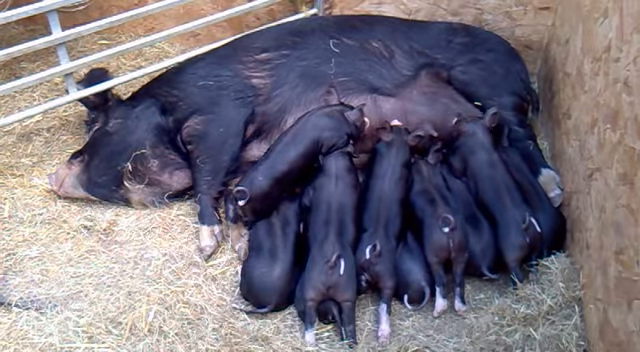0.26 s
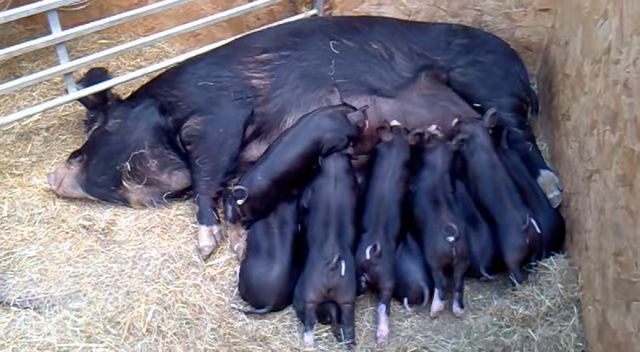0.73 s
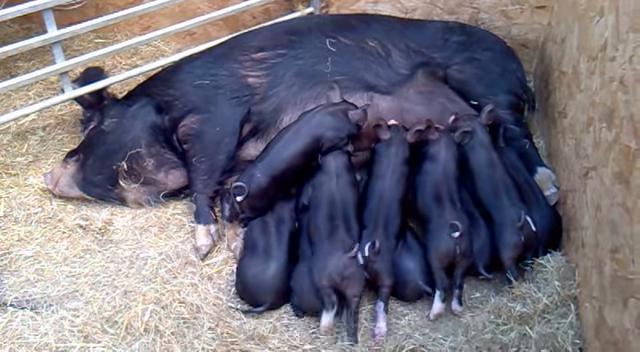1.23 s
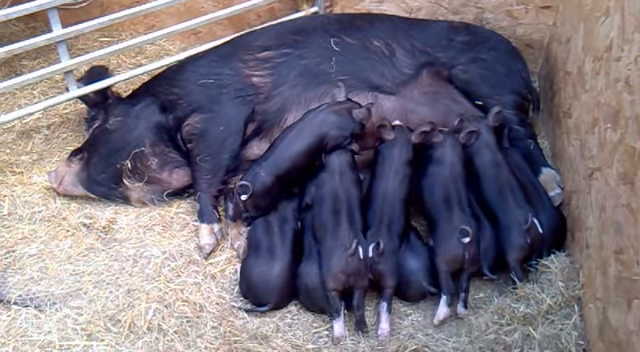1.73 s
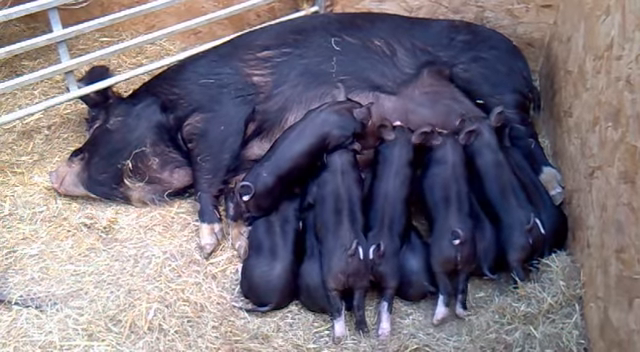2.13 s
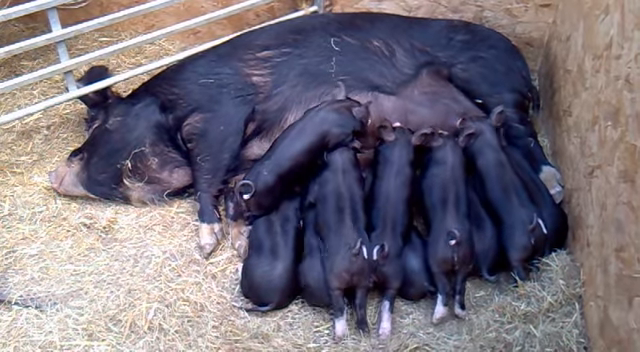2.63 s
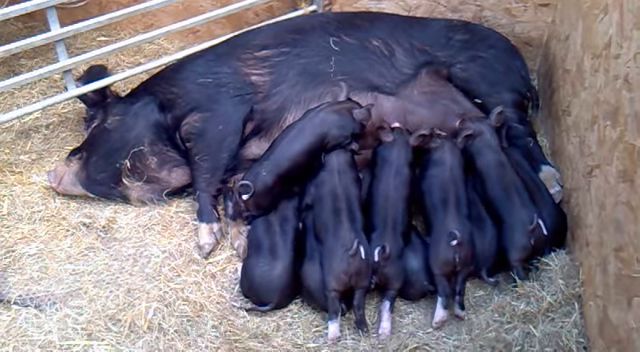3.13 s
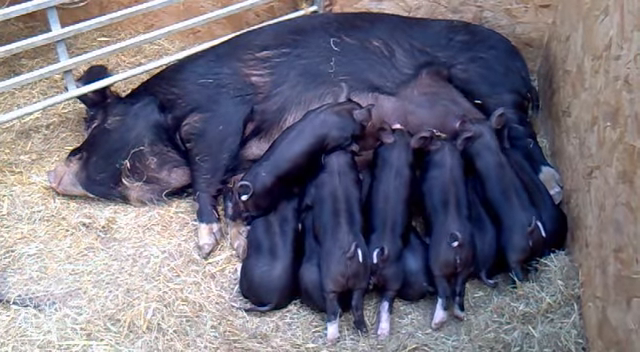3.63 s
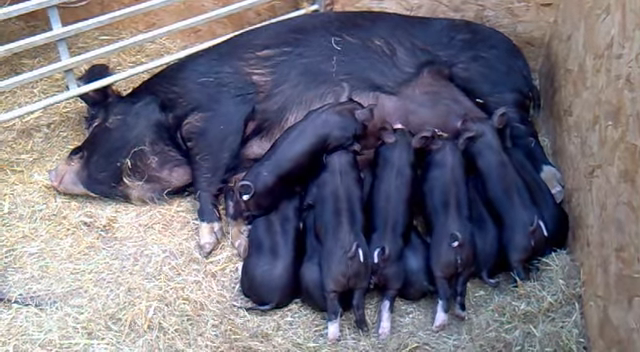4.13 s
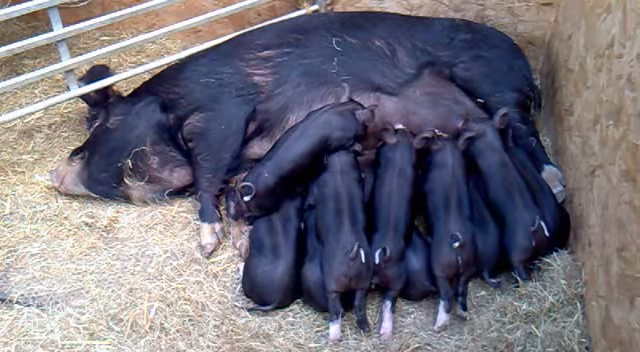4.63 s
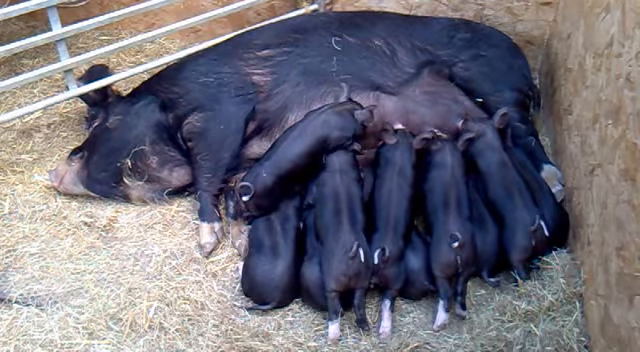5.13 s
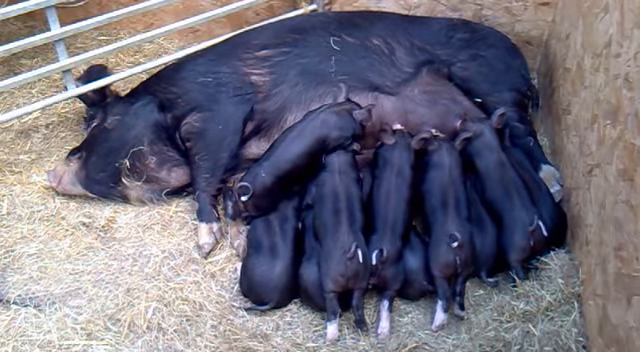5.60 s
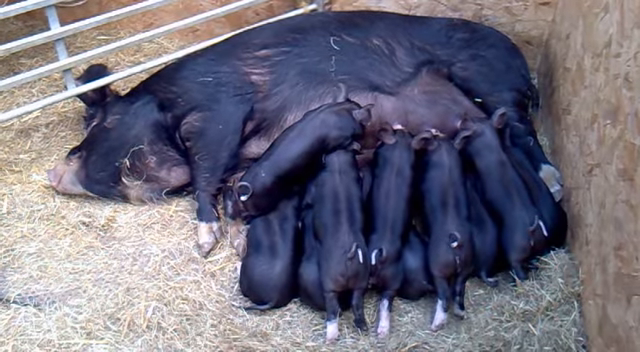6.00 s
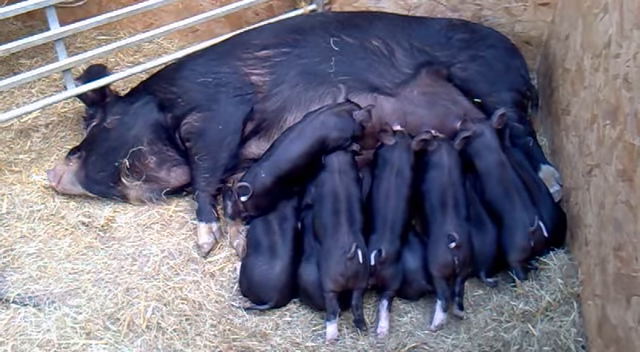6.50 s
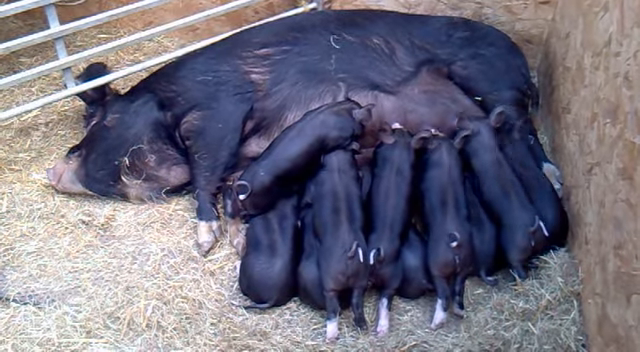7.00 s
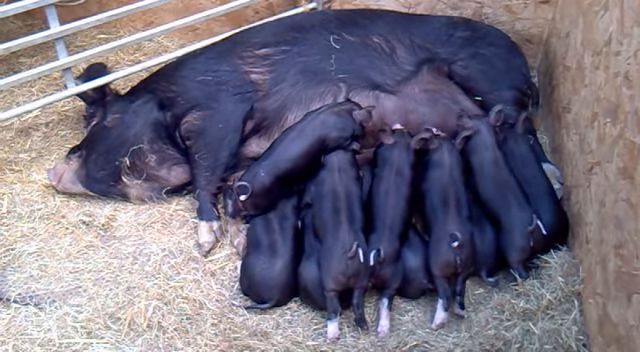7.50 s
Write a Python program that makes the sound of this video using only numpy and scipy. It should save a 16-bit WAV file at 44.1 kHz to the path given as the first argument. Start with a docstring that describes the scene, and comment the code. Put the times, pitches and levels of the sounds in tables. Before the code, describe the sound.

Heard fairly close in a boarded, straw-bedded pen, a nursing sow makes about seventeen short low grunts, croaky and nasal, some preceded by tiny throat catches. Between them come small suckling smacks, one clearer near one and a half seconds, and dry straw snaps. Thin airy whistles are barely audible far off, over low, still barn air, until a last firm grunt near the end.

```python
"""Sow grunting as piglets suckle

In a straw-bedded wooden pen a sow grunts in short runs. Each grunt is a few slow throat flaps, about 30
a second: pressure pulses excite the pen's modes, and filtered noise and a rising chirp sound in the snout.
Piglets smack (wavering tones with clicks) and stir the straw (clumps of band-passed grains).
Still air (coloured noise) and thin far-off whistles (narrow noise bands) fill the quiet barn."""
import sys
import numpy as np
from scipy import signal
from scipy.fft import rfft, irfft
from scipy.io import wavfile

SR = 44100
rng = np.random.default_rng(int(sys.argv[2]) if len(sys.argv) > 2 else 0)


def bounce(signal):
    """Save signal as a 16-bit WAV file at the path given by the first command-line argument."""
    frames = np.transpose(np.atleast_2d(signal))
    limited = np.clip(frames, -1, 1)
    pcm = np.round(limited * 32767).astype(np.int16)
    wavfile.write(sys.argv[1], SR, pcm)


N = 341775
TAIL = SR   # samples kept of any echo

# The sow's grunts. Each row: start in seconds, length in seconds, level of the strongest flap in relative dB,
# curvature of the swell in dB (fall from a crest to age zero), age at the crest in seconds,
# age at the widest nostrils in seconds, nasal rasp there in dB relative to the flap,
# snout chirp there in dB relative to the flap, mouth lift in dB.
GRUNTS = [(0.001, 0.1, -23.5, 9.5, .056, 0.045, -7.5, -14, -2),
          (0.546, .066, -23.5, 8.5, 0.033, 0.037, -7, -16.5, -1.5),
          (0.839, 0.1, -28.5, 14, 0.09, .004, -7, -15.5, 0),
          (1.356, .139, -24, 25, .092, 0.087, -7.5, -13.5, -3),
          (1.853, .099, -22.5, 20, .084, .066, -10, -19, 1.5),
          (2.366, 0.071, -22.5, 16.5, 0.073, 0.077, -6.5, -16.5, -0.5),
          (2.616, 0.1, -27, 22, 0.19, 0.04, -8, -17, 2.5),
          (2.878, 0.076, -32, 12, 0.14, 0.0044, -4.5, -13.5, 1),
          (3.62, .104, -23, 15, 0.063, 0.048, -9.5, -16.5, 3.5),
          (4.222, .067, -26, 15.5, .05, 0.046, -13, -22.5, 1.5),
          (4.586, 0.074, -34.5, 5, 0.048, 0.0044, -6, -14, 3.5),
          (4.815, .071, -31.5, 14.5, 0.14, 0.0078, -6, -15.5, 3),
          (5.469, .069, -25.5, 6, 0.048, 0.048, -9.5, -16, 2),
          (6.056, 0.064, -25, 15.5, 0.054, 0.047, -11, -17, -0.5),
          (6.356, 0.068, -30.5, 10, 0.073, 0.011, -8.5, -20, 1.5),
          (6.597, 0.077, -34, 16, 0.22, 0.0011, -9.5, -16, 2.5),
          (7.203, 0.1, -23, 23.5, .083, 0.078, -9.5, -16, 2)]


def from_db(db):
    """Amplitude ratio: 20 dB is a factor of ten."""
    return 10 ** (np.asarray(db) / 20)


def unit(x):
    """Energy normalization: the squares sum to one."""
    return x / np.sqrt(np.sum(x ** 2) + 1e-20)


def at_hz(points, hz):
    """Linear interpolation on a logarithmic frequency axis."""
    known_hz, values = np.transpose(points)
    return np.interp(np.log(np.maximum(hz, 1)), np.log(known_hz), values)


def add(track, s, sound):
    """Superposition: mix a sound into a track at a time in seconds."""
    start = max(int(round(s * SR)), 0)
    track[start:start + len(sound)] += sound[:max(N - start, 0)]


def through(x, response):
    """Linear filtering: convolve a sound with an impulse response."""
    return signal.fftconvolve(x, response)[:len(x)]


def band(x, low_hz, high_hz):
    """Butterworth band-pass: a flat band with smooth skirts."""
    sections = signal.butter(2, [low_hz, high_hz], "band", fs=SR, output="sos")
    return signal.sosfilt(sections, x)


def low_pass(x, hz):
    """Second-order Butterworth low-pass: 12 dB an octave above the corner."""
    return signal.sosfilt(signal.butter(2, hz, fs=SR, output="sos"), x)


def colour(spectrum, size=8192):
    """Minimum phase: folding the cepstrum gives a causal response with the spectrum's shape and unit energy."""
    hz = np.arange(size // 2 + 1) * SR / size
    cepstrum = irfft(np.log(from_db(at_hz(spectrum, hz))))
    cepstrum[1:size // 2] *= 2
    cepstrum[size // 2 + 1:] = 0
    return unit(irfft(np.exp(rfft(cepstrum))))


def puff(rise_s, t60, size=TAIL):
    """Exponential rise and decay: noise that swells and dies, with unit energy."""
    t = np.arange(size) / SR
    envelope = (1 - np.exp(-t / rise_s)) * from_db(-60 * t / t60)
    return unit(rng.standard_normal(size) * envelope)


def boards(direct_db, t60, wall_db=-9, wall_s=0.012):
    """Room response: direct sound, a slap from the near wall, dense reflections from the pen's boards."""
    response = puff(rise_s=0.01, t60=t60)
    response[0] += from_db(direct_db)
    add(response, wall_s, np.array([from_db(wall_db)]))
    return unit(response)


def barn_echo():
    """Late reverberation under the roof: diffuse noise that decays at its own rate in each band."""
    # Decay of the barn. Each row: frequency in Hz, t60 in seconds.
    barn_t60 = [(100, 1), (500, 0.75), (2000, 0.58), (6000, 1), (15000, 0.83)]
    t = np.arange(TAIL) / SR
    edges = np.geomspace(60, 16000, 9)
    tail = np.zeros(TAIL)
    for low_hz, high_hz in zip(edges, edges[1:]):
        t60 = at_hz(barn_t60, np.sqrt(low_hz * high_hz))
        tail += band(rng.standard_normal(TAIL), low_hz, high_hz) * from_db(-60 * t / t60)
    return unit(tail * (1 - np.exp(-t / 0.0096)))


def still_air(level_db=-65):
    """Stationary background: white noise shaped by a fixed spectrum."""
    # Spectrum of the barn's air. Each row: frequency in Hz, relative spectral level in dB.
    air_spectrum = [(25, 0), (60, -14.5), (110, -9), (200, -19), (265, -6.5), (340, -21.5), (700, -17),
                    (1200, -18.5), (1900, -24.5), (4000, -26.5), (8000, -30), (15500, -29.5)]
    noise = rng.standard_normal(N + TAIL)
    return from_db(level_db) * through(noise, colour(air_spectrum))[TAIL:]   # drop the filter's onset


def whistles(width_hz):
    """Amplitude modulation: noise on a gliding carrier makes a narrow, airy, far-off whistle."""
    # Each row: start in seconds, length in seconds, start pitch in Hz, end pitch in Hz, rms level in dB.
    whistle_table = [(0.117, 0.41, 3950, 3520, -71), (0.193, 0.21, 7260, 7200, -73),
                     (1.003, 0.27, 3780, 3650, -69.5), (4.348, 0.71, 4070, 4140, -74.5),
                     (4.974, 0.21, 3750, 3470, -77)]
    out = np.zeros(N)
    for s, length_s, start_hz, end_hz, db in whistle_table:
        count = int(length_s * SR)
        waver = band(rng.standard_normal(count), 6.1, width_hz)
        hz = np.linspace(start_hz, end_hz, count)
        tone = waver * np.sin(2 * np.pi * np.cumsum(hz) / SR) * np.sqrt(np.hanning(count))
        add(out, s, from_db(db) * np.sqrt(count) * unit(tone))
    return out


def scattered(count, db, hz, length_s, spread_db=3, spread_octaves=0.52):
    """Jittered sequence: one faint event in each equal time slot, with random time, strength and pitch."""
    events = []
    for k, (when, strength, pitch) in enumerate(rng.random((count, 3))):
        s = (k + when) * N / SR / count
        event_db = db + spread_db * (2 * strength - 1)
        event_hz = hz * 2 ** (spread_octaves * (2 * pitch - 1))
        events.append((s, event_db, event_hz, length_s))
    return events


def rustles(events, spread, grain_db):
    """Granular noise: short clumps of uneven little clicks, each clump in its own band."""
    out = np.zeros(N)
    for s, db, hz, length_s in events:
        age = np.arange(int(4 * length_s * SR)) / (length_s * SR)   # in units of length_s
        grains = rng.standard_normal(len(age)) * from_db(grain_db * rng.standard_normal(len(age)))
        clump = band(grains * np.sqrt(age) * np.exp(-2 * age), hz / spread, hz * spread)
        add(out, s, from_db(db) * np.sqrt(length_s * SR) * unit(clump))
    return out


def smacks(sucks, rise_share=0.107, wobble=0.039, click_db=-11):
    """Cavity resonance: a wet click and a wavering note that rises as the piglet's small mouth closes."""
    clicks = [(s, db + click_db, hz, length_s) for s, db, hz, length_s in sucks]
    out = rustles(clicks, spread=2.7, grain_db=18.0)
    for s, db, hz, length_s in sucks:
        age = np.arange(int(4 * length_s * SR)) / (length_s * SR)   # in units of length_s
        waver = unit(low_pass(rng.standard_normal(len(age)), hz=hz / 6)) * np.sqrt(len(age))
        pitch = hz * (1 + rise_share * (age - 0.5) + 2 * wobble * waver)
        note = np.sin(2 * np.pi * np.cumsum(pitch) / SR) * np.sqrt(age) * np.exp(-2 * age)
        # the same waver, shifted by half its length, varies the strength
        note = note * from_db(6.5 * np.roll(waver, len(age) // 2))
        add(out, s, from_db(db) * np.sqrt(length_s * SR) * unit(note))
    return out


def piglets():
    """Direct and reverberant sound: smacks and straw heard off the boards and faintly from the barn."""
    # Sucks and nuzzles placed by hand, strong to very faint. Each row: start in seconds,
    # relative level in dB, centre in Hz, time scale in seconds.
    placed_sucks = [(0.666, -52, 1430, 0.015), (0.794, -56, 1930, 0.014), (1.085, -57, 600, 0.077),
                    (1.095, -56, 284, 0.032), (1.235, -59.5, 2300, 0.029), (1.526, -41, 1654, 0.021),
                    (1.689, -63, 1920, 0.026), (2.096, -57, 1490, 0.024), (3.213, -59, 618, .022),
                    (3.866, -57.5, 1000, 0.032), (4.209, -54, 560, 0.014), (5.754, -70, 700, 0.02),
                    (6.777, -49.5, 985, 0.0076), (6.823, -62, 1450, 0.013), (6.856, -55, 537, 0.019),
                    (6.93, -54.5, 1260, 0.022), (7.032, -58, 593, 0.009), (7.563, -55.5, 268, 0.049),
                    (7.57, -54, 601.5, 0.03)]
    # Straw snapping under trotters, placed by hand. Each row: start in seconds, relative level in dB,
    # centre in Hz, time scale in seconds.
    placed_straw = [(.786, -54.5, 5060, 0.011), (.812, -61.5, 7970, 0.0097), (1.09, -62.5, 5250, 0.021),
                    (1.236, -65.5, 8450, .02), (1.528, -49, 5200, 0.011), (2.482, -41, 6000, 0.0032),
                    (3.02, -60, 4280, 0.03), (4.745, -57, 4190, 0.0049), (4.979, -56.5, 5260, 0.014),
                    (6.777, -57.5, 3630, 0.012)]
    faint_sucks = scattered(count=12, db=-64, hz=990, length_s=0.02)
    faint_straw = scattered(count=16, db=-68.5, hz=4830, length_s=0.041)
    near = smacks(placed_sucks + faint_sucks) + rustles(placed_straw + faint_straw, spread=1.26, grain_db=10.5)
    return through(near, boards(direct_db=5.0, t60=0.13)) + from_db(-19.5) * through(near, barn_echo())


def flap_ages(length_s, flap_period_s=0.034):
    """Near-periodic excitation: flaps evenly spaced from start to end, about one period apart."""
    return np.linspace(0, length_s, 1 + int(round(length_s / flap_period_s)))


def throat_flaps():
    """Source control: grunts swell in an arch as the nostrils flare once; catches stay level.

    Yields (start in seconds, level in dB, rasp in dB and chirp in dB relative to the level)."""
    # Soft catches of the throat, mostly just before a grunt. Each row: start in seconds, length in seconds,
    # relative level in dB, nasal rasp in dB relative to that level.
    catches = [(0.448, 0.018, -46.5, -23), (0.521, 0, -42.5, -21), (1.283, 0.021, -50.5, -18),
               (1.784, 0.016, -51.5, -11), (2.294, 0, -48.5, -23), (3.514, 0.028, -48.5, -19),
               (4.162, 0.037, -57, -31), (4.432, 0, -47, -10.5), (4.55, 0, -53.5, -29),
               (4.781, 0, -50.5, -31), (5.347, 0.023, -49.5, -15), (5.44, 0, -52.5, -18),
               (6.566, 0.011, -52, -22), (7.124, 0.0018, -46.5, -18.5)]
    flare_db_per_s, narrow_db_per_s = 550, 112   # the nostrils snap open and narrow again slowly
    leak_rasp_db, leak_chirp_db = -56.5, -63.5   # least sound through shut nostrils, however strong the flap
    for start_s, length_s, db, swell_db, crest_s, nose_s, rasp_db, chirp_db, _ in GRUNTS:
        ages = flap_ages(length_s)
        arch = -swell_db * (ages / crest_s - 1) ** 2
        level = db + arch - arch.max()
        nostrils = np.minimum(flare_db_per_s * (ages - nose_s), narrow_db_per_s * (nose_s - ages))
        rasp = np.maximum(rasp_db + nostrils, leak_rasp_db - level)
        chirp_level = np.maximum(chirp_db + nostrils, leak_chirp_db - level)
        yield from zip(start_s + ages, level, rasp, chirp_level)
    for start_s, length_s, db, rasp_db in catches:
        for age in flap_ages(length_s):
            yield start_s + age, db, rasp_db, rasp_db - 8.5


def chirp(start_hz, end_hz, length_s, size, rough=0.78):
    """Swept resonance: the snout's note climbs, roughly, as each flap pushes it open."""
    length_s = length_s * np.exp(rng.normal(0, 0.24))
    progress = np.minimum(np.arange(size) / SR / length_s, 1)
    hz = (start_hz + (end_hz - start_hz) * progress ** 1.58) * np.exp(rng.normal(0, 0.016))
    grit = unit(low_pass(rng.standard_normal(size), hz=450)) * np.sqrt(size)
    envelope = np.abs(np.sin(np.pi * progress ** 1.02))
    return unit(np.sin(2 * np.pi * np.cumsum(hz) / SR) * (1 + rough * grit) * envelope)


def flaps(flap_s=0.03, hiss_db=-5, soft_hz=780, hard_hz=3200, size=4096):
    """Source excitation: each flap gives a pulse, throat turbulence, a nasal rasp and a snout chirp."""
    # Broad colour of the throat alone. Each row: frequency in Hz, relative spectral level in dB.
    throat_spectrum = [(30, -33.5), (110, -13.5), (170, -5), (230, -15.5), (300, -11.5), (420, -2.5),
                       (650, -4.5), (900, -8.5), (1300, -11), (1550, -26.5), (2100, -15.5), (3000, -36),
                       (6000, -43.5)]
    # Colour of the nasal rasp. Each row: frequency in Hz, relative spectral level in dB.
    rasp_spectrum = [(1100, 1.5), (1500, -33), (1700, -4.5), (1830, -11), (1950, 0), (2080, -7.5),
                     (2350, 0), (2480, -12), (2620, -3), (2850, -25), (3300, -36), (5000, -16.5),
                     (8000, -40), (15000, -57)]
    # Colour of the air that bursts through the snout. Each row: frequency in Hz, relative spectral level in dB.
    snout_spectrum = [(2700, -27), (3000, 1.5), (3230, 12.5), (3400, -11), (3550, -18), (3750, -6),
                      (3970, 6.5), (4300, -9), (4600, -9.5), (4830, -1.5), (5700, -37.5), (6500, -20),
                      (7200, -8), (9000, -45)]
    pulses, spurts, nose_pulses, rasps, chirps = np.zeros((5, N))
    throat_colour, rasp_colour, snout_colour = colour(throat_spectrum), colour(rasp_spectrum), colour(snout_spectrum)
    click = signal.unit_impulse(size)
    for s, level_db, nasal_db, chirp_db in throat_flaps():
        strength = from_db(level_db) * np.sqrt(flap_s * SR)
        effort = np.clip((level_db + 50) / 26, 0, 1)
        # a gentle flap closes softly and sounds duller
        edge_hz = soft_hz * (hard_hz / soft_hz) ** effort
        add(pulses, s, strength * low_pass(click, edge_hz))
        spurt = through(puff(rise_s=0.0035, t60=0.078, size=size), throat_colour)
        add(spurts, s, strength * unit(low_pass(spurt, edge_hz)))
        add(nose_pulses, s, strength * from_db(nasal_db) * click)
        # the nose and snout noises sound a moment after the throat opens
        rasp = unit(through(puff(rise_s=0.0053, t60=0.032, size=size), rasp_colour))
        add(rasps, s + 0.003, strength * from_db(nasal_db) * rasp)
        sweep = chirp(start_hz=3126, end_hz=3650 + 1450 * effort ** 3, length_s=0.0102, size=size)
        sweep = unit(low_pass(sweep, hz=4800))
        hiss = unit(through(puff(rise_s=0.004, t60=0.031, size=size), snout_colour))
        add(chirps, s + 0.001005, strength * from_db(chirp_db) * sweep)
        add(chirps, s + 0.002, strength * from_db(chirp_db + hiss_db) * hiss)
    return pulses, spurts, nose_pulses, rasps, chirps


def ringing(modes, straw_t60=0.79):
    """Modal sum: neighbours start in opposite directions, so the ring builds up; straw damps every mode."""
    t = np.arange(TAIL) / SR
    rings = np.zeros(TAIL)
    for k, (hz, db, t60) in enumerate(modes):
        rings += (-1) ** k * from_db(db - 60 * t / t60) * np.sin(2 * np.pi * hz * t)
    return unit(rings * from_db(-60 * t / straw_t60))


def open_mouth(x, corner_hz=750):
    """Spectral tilt: a wider mouth favours what lies above the first resonance; each grunt has its own."""
    start_s, length_s, *_, lift_db = np.transpose(GRUNTS)
    # the opening glides from the end of one grunt to the end of the next
    lift = from_db(np.interp(np.arange(N) / SR, start_s + length_s, lift_db))
    low = signal.lfilter(*signal.butter(1, corner_hz, fs=SR), x)
    return low / lift + (x - low) * lift


def soft_hiss(pulses, hiss_db=-38, follow=0.3, rise_s=0.013, t60=0.61, corner_hz=7000):
    """Envelope following: a faint high hiss swells with the smoothed pulse power and fades slowly."""
    t = np.arange(TAIL) / SR
    fade = (1 - np.exp(-t / rise_s)) * from_db(-60 * t / t60) ** 2   # squared: a decay of power
    power = np.maximum(through(pulses ** 2, fade / fade.sum()), 0)
    hiss = signal.lfilter(*signal.butter(1, corner_hz, "high", fs=SR), rng.standard_normal(N))
    return from_db(hiss_db) * power ** follow * hiss


def sow(body_db=-2.83, rough_db=-9, rasp_db=-4, nasal_ring_db=-5.5, snout_db=-3.0, barn_db=-21):
    """Source and filter: pulses ring the pen, turbulence scatters off its boards, the barn answers faintly."""
    # Resonances of throat and pen together. Each row: frequency in Hz, relative level in dB,
    # t60 in seconds before the straw's damping.
    pen_modes = [(28.8, -21, 0.37), (56.3, -13.5, 0.64), (91.4, -21, 0.63), (150.4, -6.5, 0.24),
                 (181.2, -3.5, 0.36), (267.1, -9.5, 0.51), (348, -9, 0.2), (395, 6, 0.099),
                 (430.3, 8.5, 0.11), (465, 4.6, 0.2), (476, 9.5, 0.13), (501.1, 4.5, 0.34),
                 (555.3, 3.5, 0.19), (622.4, 0.5, 0.43), (666, 1, 0.35), (715, -7, 0.29),
                 (737.7, 2.5, 0.23), (768.6, -0.5, 0.25), (830, -15, 0.096), (880.2, 3, 0.12),
                 (901.5, 1, 0.17), (950, -8.5, 0.26), (1031, -12.5, 0.2), (1089, -7.5, 0.38),
                 (1149, -1, 0.29), (1234, -13.5, 0.13), (1312, -6.5, 0.18), (1365, -9.5, 0.12),
                 (1424, -20, 0.32)]
    # Sharp resonances of the nasal passage. Each row: frequency in Hz, relative level in dB,
    # t60 in seconds before the straw's damping.
    nasal_modes = [(1678, -5.5, 0.21), (1767, -8, 0.13), (1934, -5, 0.27), (2038, 3, 0.19), (2073, 1, 0.11),
                   (2160, -2, 0.26), (2300, -9, 0.21), (2390, -6, 0.17), (2630, -5, 0.072),
                   (3226, -3.5, 0.18)]
    pulses, spurts, nose_pulses, rasps, chirps = flaps()
    body = from_db(body_db) * through(pulses, ringing(pen_modes))
    rough = from_db(rough_db) * through(spurts, boards(direct_db=-4.5, t60=0.19))
    nose = from_db(rasp_db) * through(rasps, boards(direct_db=-4.0, t60=0.27))
    nose = nose + from_db(nasal_ring_db) * through(nose_pulses, ringing(nasal_modes))
    snout = from_db(snout_db) * through(chirps, boards(direct_db=4.0, t60=0.21))
    echo = from_db(barn_db) * through(spurts + chirps, barn_echo())
    return open_mouth(body + rough) + nose + snout + echo + soft_hiss(pulses)


def scene():
    """Superposition: sow and piglets in the pen, over whistles and the still air of the barn."""
    return (still_air() + whistles(width_hz=490) + piglets() + sow())[None]


def record(dry, cutoff_hz=15800):
    """Elliptic low-pass: the top is cut steeply."""
    return signal.sosfilt(signal.ellip(12, 0.1, 70, cutoff_hz, fs=SR, output="sos"), dry)


dry = scene()
out = record(dry)
bounce(out)
```